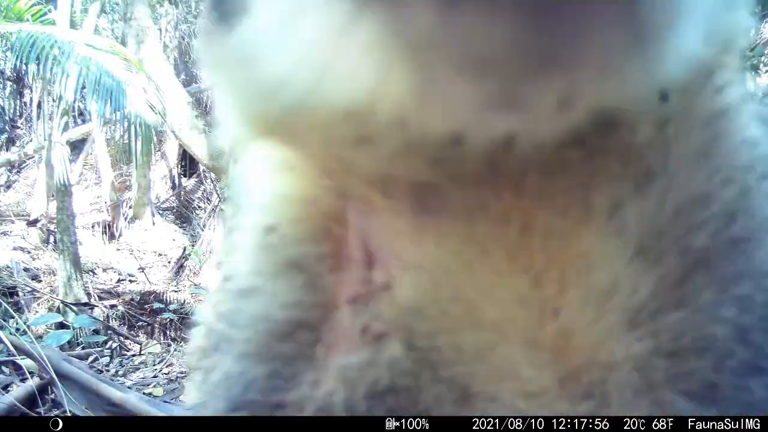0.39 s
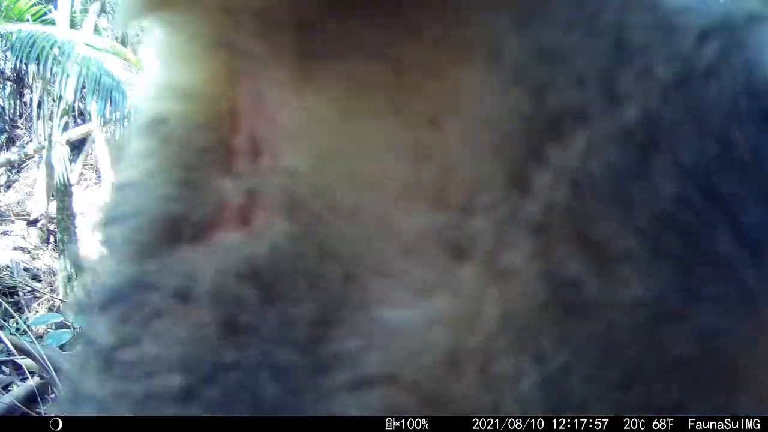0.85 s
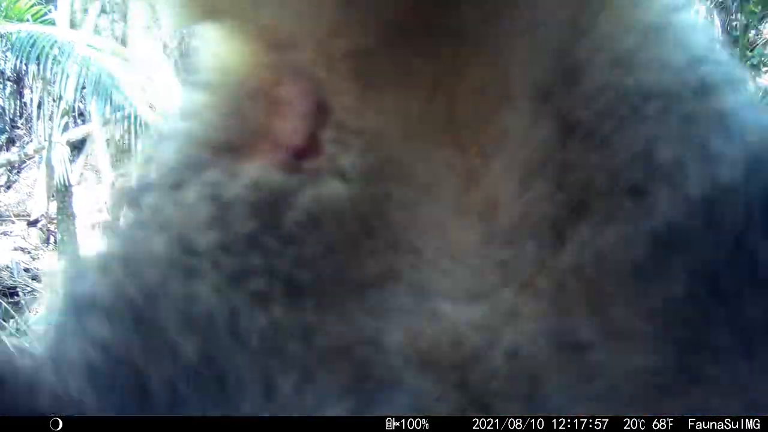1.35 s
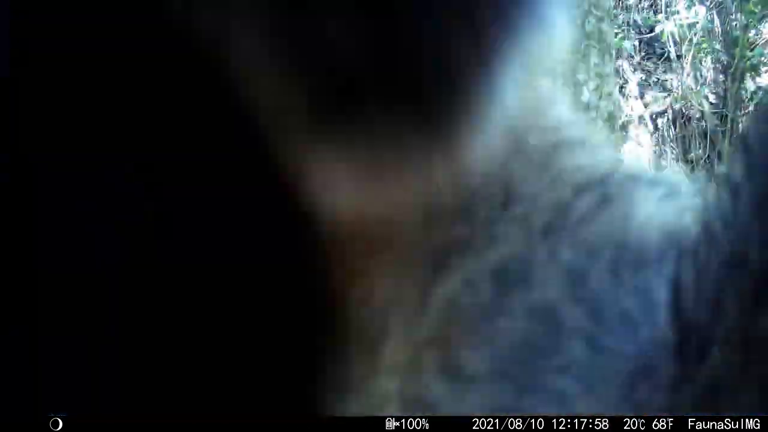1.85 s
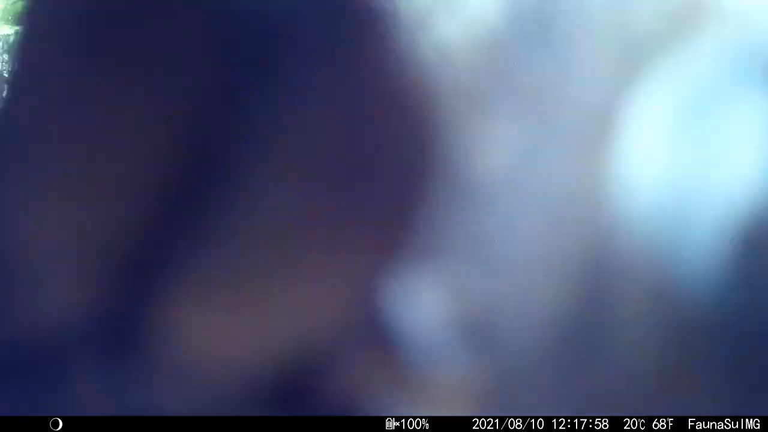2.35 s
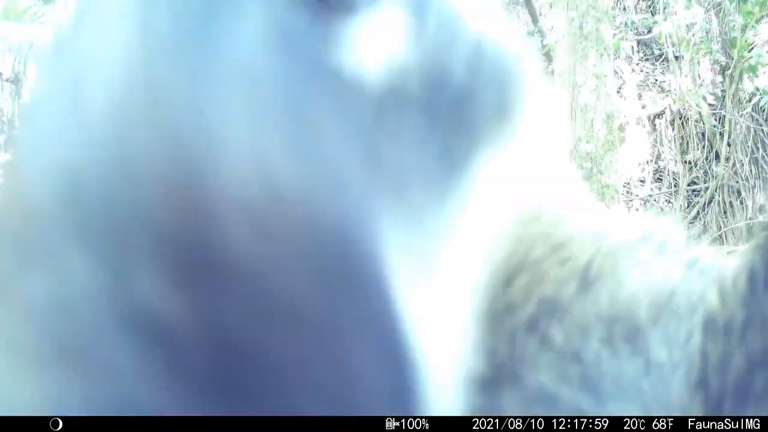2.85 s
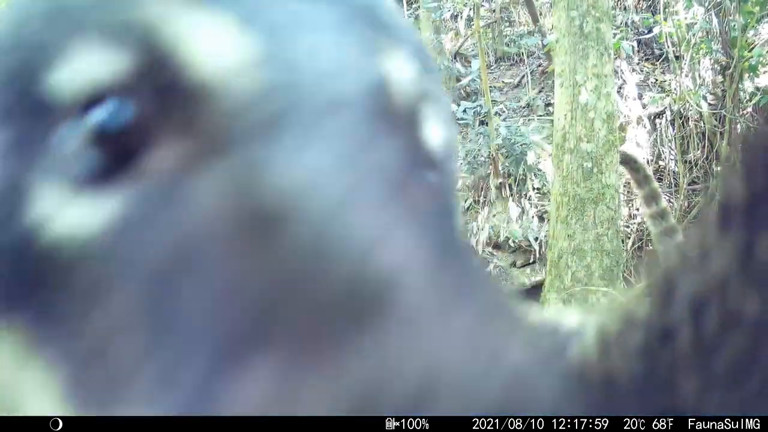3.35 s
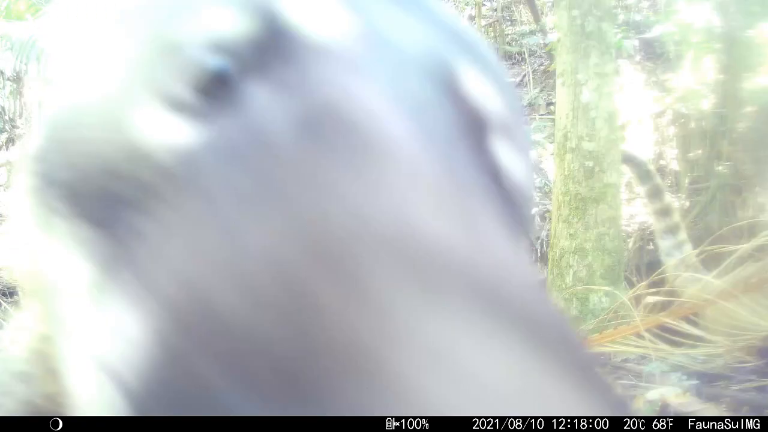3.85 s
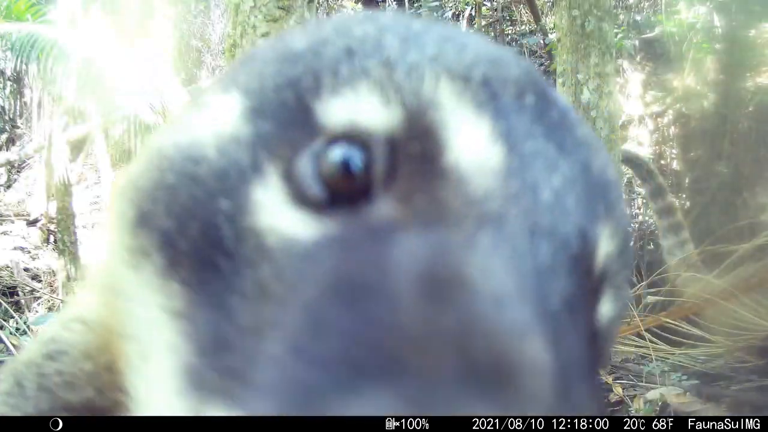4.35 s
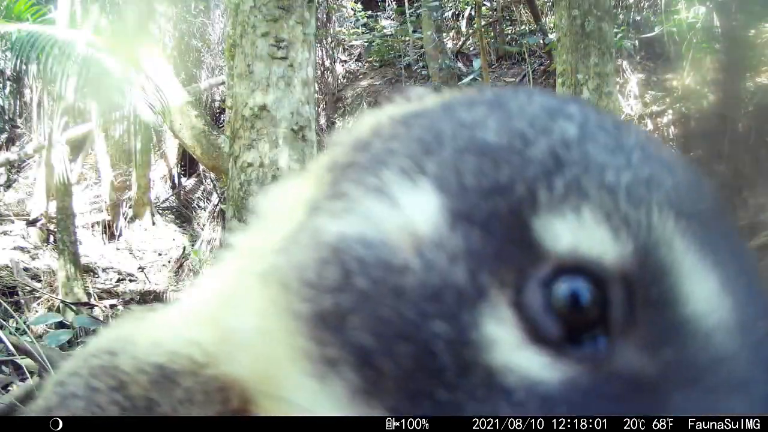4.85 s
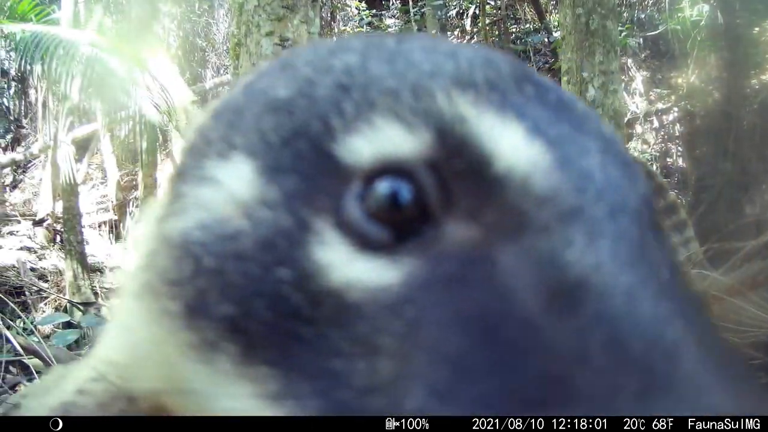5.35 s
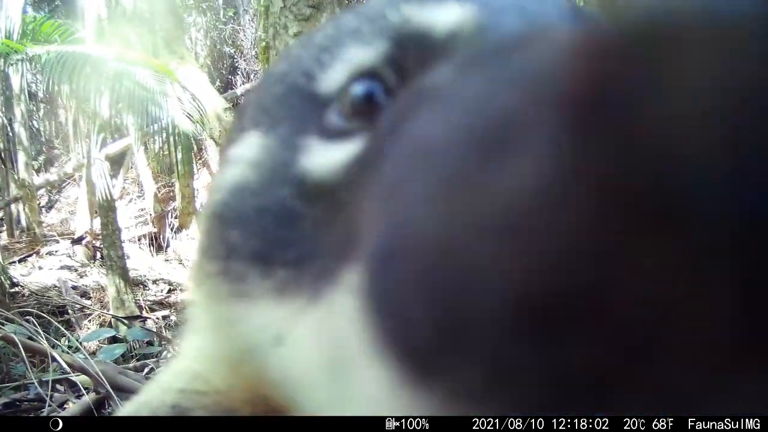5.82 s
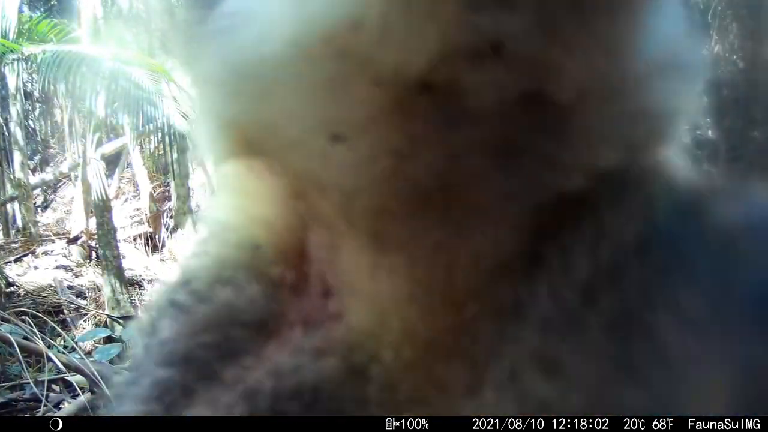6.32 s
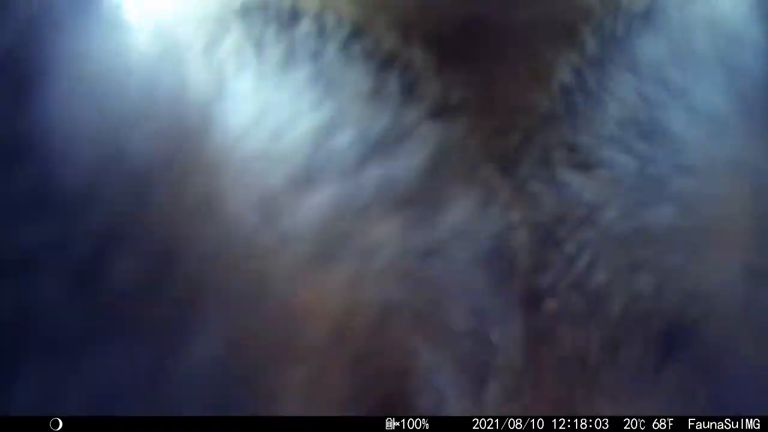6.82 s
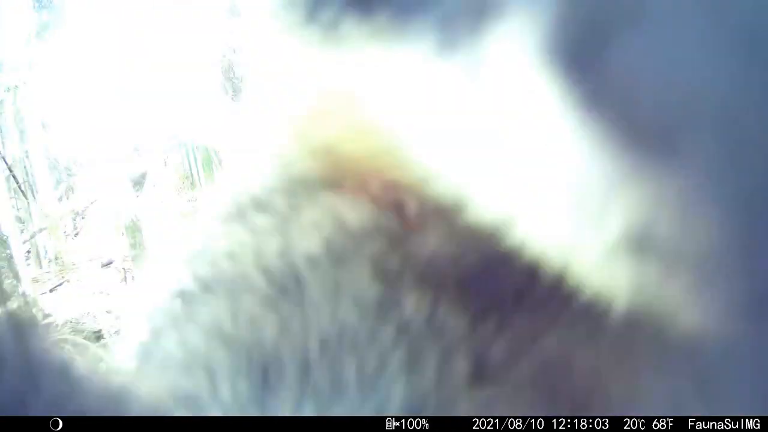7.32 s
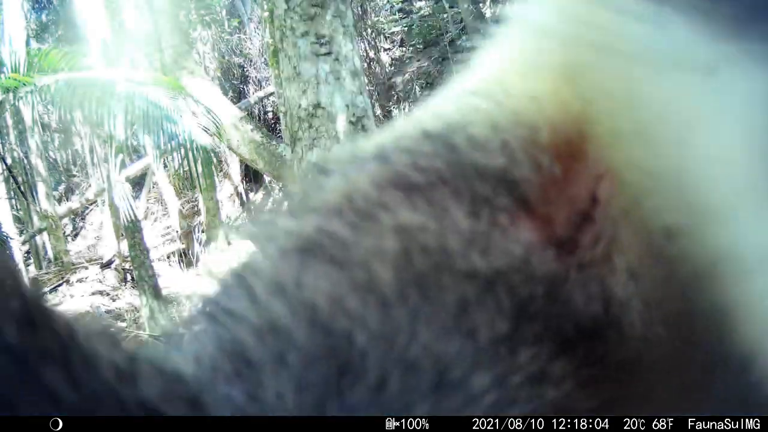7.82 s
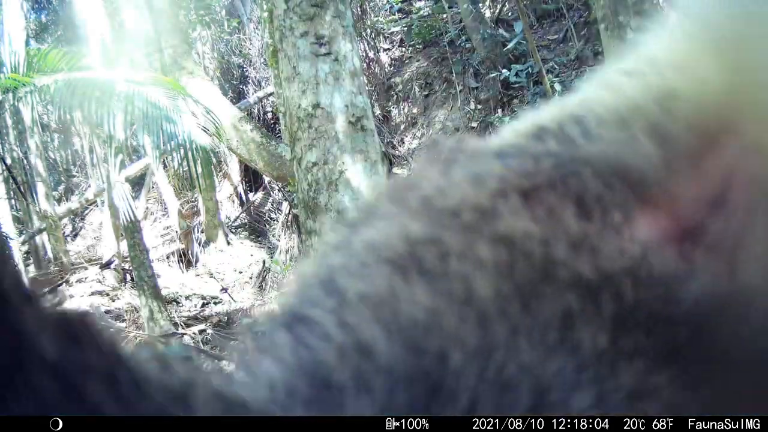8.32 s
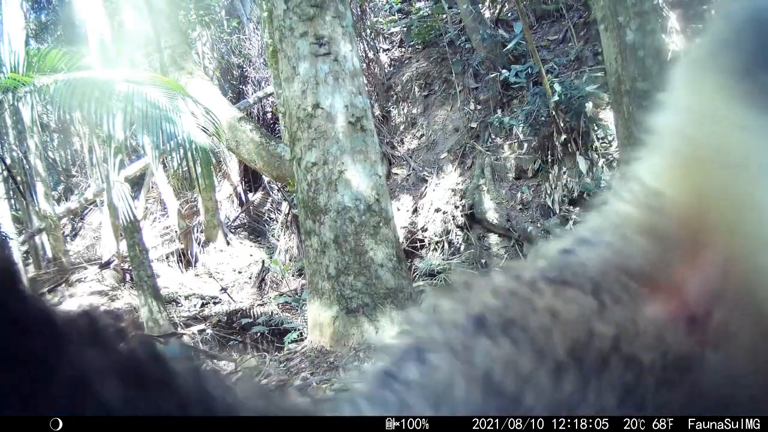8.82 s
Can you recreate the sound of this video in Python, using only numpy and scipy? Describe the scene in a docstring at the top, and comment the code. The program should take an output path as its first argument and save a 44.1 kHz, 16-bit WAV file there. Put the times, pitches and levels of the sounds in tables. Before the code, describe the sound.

A small furry mammal rubs, scrapes and claws a plastic case right at the microphone, with sharp clicks, soft bumps and two tiny squeaks.

```python
"""In a forest, right up against the microphone, a small mammal noses, rubs and claws a plastic camera case.
Faint forest and microphone hiss lies behind shaped noise for fur, case ringing and body rumble.
Claws scrape briefly or drag and set the case ringing; sniffs and nudges push on the microphone as pressure dips.
Now and then the animal gives thin gliding chirps and short falling grunts, made of sines."""
import sys
import numpy as np
from scipy import signal
from scipy.io import wavfile
from scipy.ndimage import uniform_filter1d

SR = 44100
rng = np.random.default_rng(int(sys.argv[2]) if len(sys.argv) > 2 else 0)


def linear_from_db(decibels):
    """Turn decibels (scalar or array-like) into linear amplitude factors; 0 gives 1."""
    return 10 ** (np.asarray(decibels, float) / 20)


def wrap_up_sound(samples):
    """Save the sound to the file named by the first command line argument, as 16-bit audio."""
    columns = np.atleast_2d(samples).T
    # keep every value between -1 and 1, then stretch to whole-number steps
    tamed = np.clip(columns, -1, 1)
    steps = np.round(tamed * 32767).astype(np.int16)
    wavfile.write(sys.argv[1], SR, steps)


N = 405279  # samples


def evened(x):
    """Scales to rms 1."""
    return x / np.sqrt(np.mean(x ** 2) + 1e-20)


def add(mix, start_s, sound):
    """Mixes a sound in from its start time."""
    part = mix[max(round(start_s * SR), 0):][:len(sound)]
    part += sound[:len(part)]


def noise(spectrum, patchy_db, size=512):
    """Noise of a given spectrum whose level drifts in patches of time and pitch, rms 1."""
    frames = 4 * N // size + 5
    bin_hz = np.fft.rfftfreq(size, 1 / SR)
    real, imaginary, patches = rng.standard_normal((frames, len(bin_hz), 3)).T
    patches = uniform_filter1d(patches, size=8, axis=0)
    patches = evened(uniform_filter1d(patches, size=12, axis=1))
    point_hz, point_db = np.transpose(spectrum)
    colour_db = np.interp(np.log(bin_hz + 1), np.log(point_hz + 1), point_db)[:, None]
    bins = (real + 1j * imaginary) * linear_from_db(colour_db + patchy_db * patches)
    return evened(signal.istft(bins, nperseg=size, noverlap=3 * size // 4)[1][:N])


def gritty(per_s, spread_db, grain_s):
    """Uneven contact: a steady gain with sudden short slips of random size on top, rms 1."""
    slip_db = spread_db * np.minimum(rng.exponential(1, N), 4)
    slips = (rng.random(N) < per_s / SR) * linear_from_db(slip_db)
    fade = np.exp(-1 / (grain_s * SR))
    return evened(1 + signal.lfilter([1], [1, -fade], slips))


# the small case cannot ring below its first mode
THIN = signal.butter(5, 1200, "high", fs=SR, output="sos")
# modes of the plastic case: pitch_hz, width_hz (before damping), level_db (relative)
CASE_MODES = [(1365, 720, -4), (2366, 510, 6.5), (3135, 255, 2.5), (4110, 770, 8.5), (5930, 2170, 9),
              (7400, 420, 0.5), (8950, 440, -25)]


def case_ring(gains_db, damping, shift):
    """Impulse response of the plastic case, energy 1; a grip on the case shifts and damps its modes."""
    hz, width_hz, level_db = np.transpose(CASE_MODES)[:, :, None]
    t = np.arange(900) / SR
    width_hz = width_hz * damping
    sign = (-1.) ** np.arange(len(CASE_MODES))[:, None]  # neighbouring modes move the wall in opposite ways
    modes = np.sqrt(width_hz) * np.exp(-np.pi * width_hz * t) * np.sin(2 * np.pi * hz * shift * t)
    ring = (sign * linear_from_db(level_db + gains_db) * modes).sum(0)
    return ring / np.linalg.norm(ring)


# forest and microphone hiss: pitch_hz, level_db (per Hz, relative)
AIR_SPECTRUM = [(12, -50.5), (20, -15), (45, -1.5), (120, -9), (160, -7), (596, -18.5), (11400, -44.5),
                (15000, -35.5), (16400, -26.5)]


def forest_air():
    """Steady forest and microphone hiss: patchy shaped noise at -57 dB rms."""
    return linear_from_db(-57) * noise(AIR_SPECTRUM, 3.0, size=1024)


# sniffs and nudges on the microphone: dip_s, level_db (peak), pitch_hz of the pressure dip
PUFFS = [(0.129, -44, 22), (0.292, -38, 25.1), (0.758, -38, 43.6), (1.227, -34, 68), (1.437, -37, 50.7),
         (1.96, -34, 29), (2.257, -38, 63), (2.756, -38, 28.8), (2.966, -45, 29), (3.188, -44.5, 23.4),
         (3.552, -32, 95), (3.769, -47, 24.5), (3.983, -45, 20.7), (4.262, -29, 36.8), (4.628, -44, 27.2),
         (4.981, -35, 66), (5.532, -36, 47.3), (5.965, -39.5, 28), (6.453, -42, 41.7), (6.617, -27, 65),
         (6.654, -28.5, 130), (6.765, -29, 44.2), (6.786, -29, 141), (7.401, -37, 37.7),
         (7.957, -42.5, 30.1), (8.133, -41.5, 60.4), (8.711, -44, 33), (9.058, -38, 54.6)]


def sniffs():
    """Each puff of air is one soft dip of pressure with a rise on either side."""
    out = np.zeros(N)
    for dip_s, level_db, hz in PUFFS:
        u = np.arange(-1.2 / hz, 2.4 / hz, 1 / SR) * hz
        puff = -linear_from_db(level_db) * np.cos(2 * np.pi * u) * np.exp(-2.5 * u ** 2)
        add(out, dip_s - 1.2 / hz, puff)
    return out


def voice(hz, level_db, peak, edge_db, waver_share):
    """Phase and loudness of one call: a wavering pitch, level up to a peak (place 0-1) and down again."""
    u = np.linspace(0, 1, len(hz))
    waver = evened(uniform_filter1d(rng.standard_normal(4000), size=40))[:len(hz)]
    from_peak = np.where(u < peak, 1 - u / peak, (u - peak) / (1 - peak))
    turns = 2 * np.pi * np.cumsum(hz * (1 + waver_share * waver)) / SR
    gain = np.sqrt(2) * linear_from_db(level_db + edge_db * from_peak ** 2)
    return turns, gain * signal.windows.tukey(len(hz), .25)


# evenly gliding chirps: start_s, length_ms, first_hz, last_hz, level_db (rms at the peak), peak place 0-1
CHIRPS = [(3.473, 8.2, 8040, 8360, -36, .5), (3.483, 16.5, 6900, 7460, -19.5, 1),
          (3.494, 17, 8440, 7900, -14.5, 0), (3.51, 11, 8950, 10700, -19, 0.75),
          (6.958, 8.1, 7650, 8400, -35.5, 0.63), (6.972, 22, 7280, 8330, -16, 0.42),
          (6.996, 23, 10200, 8800, -29.5, 1), (7.56, 37, 8200, 9700, -33.5, .75)]


def chirps():
    """Thin chirps: one wavering sine each, gliding evenly from the first pitch to the last."""
    out = np.zeros(N)
    for start_s, ms, first_hz, last_hz, level_db, peak in CHIRPS:
        hz = np.linspace(first_hz, last_hz, round(ms * SR / 1000))
        turns, gain = voice(hz, level_db, np.clip(peak, .05, .95), edge_db=-15, waver_share=.009)
        add(out, start_s, gain * np.sin(turns))
    return out


# grunts: start_s, length_ms, first_hz, level_db (rms of the fundamental at the peak)
GRUNTS = [(3.535, 33, 794, -21.5), (6.961, 9.5, 348, -40.5), (7.0105, 27, 673, -30.5),
          (7.591, 21, 342, -40)]
GRUNT_REST_HZ = 335
GRUNT_SAG, GRUNT_BREAK = .25, .32  # share of pitch lost before the break, place of the break 0-1
OVERTONE_DB, HALF_DB = -7, -5.5  # second harmonic before the break, half-pitch tone after it


def grunts():
    """Each grunt sags, then breaks to a resting pitch where every second pulse is weaker."""
    out = np.zeros(N)
    for start_s, ms, first_hz, level_db in GRUNTS:
        u = np.linspace(0, 1, round(ms * SR / 1000)) / GRUNT_BREAK
        high = 1 / (1 + u ** 16)  # 1 before the break, 0 after it
        hz = high * first_hz * (1 - GRUNT_SAG * u) + (1 - high) * GRUNT_REST_HZ
        turns, gain = voice(hz, level_db, peak=.56, edge_db=-15, waver_share=.1)
        overtone = linear_from_db(OVERTONE_DB) * high * np.sin(2 * turns)
        half_pitch = linear_from_db(HALF_DB) * (1 - high) * np.sin(turns / 2)
        add(out, start_s, gain * (np.sin(turns) + half_pitch + overtone))
    return out


# rumble of the body: pitch_hz, level_db (per Hz, relative)
BODY_SPECTRUM = [(50, -17), (90, -21.5), (340, -5.5), (520, -4.5), (900, -6.5), (1500, -16), (2600, -53)]


def body_rumble():
    """Low patchy noise of the body with uneven contact."""
    return noise(BODY_SPECTRUM, 1.5, size=1024) * gritty(120, 1.0, 0.004)


# hiss of fur: pitch_hz, level_db (per Hz, relative)
FUR_SPECTRUM = [(350, -48), (1250, -10.5), (2800, -13), (4400, -6.5), (6100, -6), (7200, -7), (10000, -10),
                (14300, -16), (15700, -35.5), (16400, -54.5)]


def fur_hiss(grit):
    """Fur sliding over the case: patchy shaped noise, roughened by the grit of the contact."""
    return grit * noise(FUR_SPECTRUM, 2.6, size=256)


GRIP_SHIFT, GRIP_PER_S = .025, 2  # largest shift of the modes as a share, new grips per second


def pressed_case(grit):
    """Gritty noise rings the damped low modes of the case, which a wandering grip moves, rms 1."""
    hz, _, level_db = np.transpose(CASE_MODES)[:, :, None]
    # a soft touch rings the low modes alike and misses the high ones
    missed_db = np.where(hz > 3600, -18, -level_db)
    drive = grit * gritty(90, 1.2, 0.006) * rng.standard_normal(N)
    grips = rng.random(N // SR * GRIP_PER_S + 9)
    grip = np.interp(np.arange(N) / SR * GRIP_PER_S, np.arange(len(grips)), grips)
    ring = np.zeros(N)
    for place in (0, .5, 1):  # crossfades between three grips
        share = np.sqrt(np.maximum(1 - 2 * abs(grip - place), 0))
        response = case_ring(missed_db, .4, 1 + GRIP_SHIFT * (2 * place - 1))
        ring += signal.oaconvolve(drive * share, response)[:N]
    ring = signal.sosfilt(signal.butter(4, 3600, fs=SR, output="sos"), ring)
    return evened(signal.sosfilt(THIN, ring))


def swells(rows):
    """Power over time of swells (peak_s, rise_ms and fade_ms per 20 dB, level_db), summed."""
    power, reach = np.zeros(N), 3
    round_off = 1.17  # shape in dB: 1 a pointed peak, 2 a rounded one
    for peak_s, rise_ms, fade_ms, level_db in rows:
        first = max(round((peak_s - reach * rise_ms / 1000) * SR), 0)
        last = min(round((peak_s + reach * fade_ms / 1000) * SR), N)
        at = np.arange(first, last)
        ms = (at / SR - peak_s) * 1000
        away = np.where(ms < 0, -ms / rise_ms, ms / fade_ms)
        power[at] += linear_from_db(level_db - 20 * away ** round_off) ** 2
    return power


# resting contact of fur and case between strokes: time_s, level_db (hiss)
REST = [(0.0, -37), (0.35, -48.5), (0.45, -33.5), (0.67, -34.5), (0.87, -38), (1.23, -41), (1.56, -51),
        (1.77, -48), (2.1, -50), (2.58, -55), (3.12, -54), (3.44, -58.5), (3.5, -56), (3.6, -40.5),
        (3.8, -45), (3.86, -55), (3.95, -53), (4.91, -54.5), (5.131, -37), (5.451, -65), (5.85, -58.5),
        (6.2, -54), (6.902, -54), (7.36, -48.5), (7.5, -42), (7.7, -52), (8.19, -53.5), (8.5, -50.5),
        (8.85, -48), (9.19, -46)]
REST_RING_DB, REST_RUMBLE_DB = -13.5, -11.5  # against the resting hiss
# rubbing strokes: peak_s, rise_ms and fade_ms (per 20 dB), level_db (fur hiss), ring_db (against the hiss)
STROKES = [(0.017, 5, 30, -26, -9), (0.12, 150, 344, -41.5, -10), (0.417, 33, 175, -21, -25),
           (0.731, 94, 77, -18.5, -19), (0.984, 34, 300, -25.5, -16), (1.201, 60, 104, -16.5, -7.5),
           (1.28, 45, 23, -22, -5), (1.425, 99, 194, -30, -26), (1.641, 277, 138, -30.5, -7),
           (1.958, 99, 144, -39.5, 5), (2.2, 46, 102, -38.5, 3.5), (2.256, 24, 52, -29.5, 4.5),
           (2.441, 44, 35, -34.5, 2.5), (2.527, 30, 27, -32, -0.5), (2.656, 44, 35, -28.5, 7.5),
           (2.779, 27, 126, -35, -5.5), (2.959, 64, 19, -24, -4.5), (3.029, 53, 57, -31.5, -4.5),
           (3.089, 35, 43, -37, -3.5), (3.516, 5, 74, -28, -35), (3.538, 15, 72, -28, -2),
           (3.665, 60, 200, -36.5, -2.5), (3.765, 150, 90, -34.5, -10), (3.824, 66, 7, -23.5, -9),
           (3.897, 79, 43, -45.5, 3), (4.194, 16, 46, -43, -2.5), (4.385, 18, 30, -44.5, -16),
           (4.66, 54, 120, -49.5, -1.5), (4.75, 100, 23, -46.5, -25), (4.909, 76, 100, -45.5, -10),
           (4.995, 35, 300, -33.5, -3), (5.12, 12, 7, -24, 10.5), (5.499, 23, 193, -47.5, -1.5),
           (5.549, 86, 18, -40, -0.5), (5.889, 4, 28, -37.5, -5), (6.158, 53, 27, -38.5, 5.5),
           (6.439, 14, 74, -28.5, -5), (6.473, 49, 9, -21.5, -4.5), (6.605, 30, 58, -34, 1.5),
           (6.697, 25, 94, -37.5, -10), (6.811, 112, 35.5, -30, -2.5), (7.018, 65, 135, -43, -6),
           (7.203, 72, 200, -30, -5.5), (7.277, 24, 58, -24, -6.5), (7.319, 132, 28, -22, -35),
           (7.601, 11, 129, -39.5, -12), (8.296, 72, 131, -24, -38), (8.422, 102, 123, -29.5, -11),
           (8.669, 98, 166, -40, -12), (8.973, 14, 23, -31, 1), (9.135, 18, 24, -30.5, 10.5)]
STROKE_RUMBLE_DB = -20  # against the hiss of a stroke
# a stroke that rings the case above LIGHT_DB loses hiss outside CORE_HZ, DULLING dB per dB
CORE_HZ, DULLING, LIGHT_DB = [3900, 10000], 0.29, -13
# the body leans on the camera: peak_s, swell_ms (per 20 dB, either way), level_db (rumble)
NUDGES = [(0.0, 103, -45), (0.449, 66, -41.5), (2.255, 81, -45.5), (2.523, 19.5, -23.5), (4.262, 48, -51),
          (4.998, 69, -37.5), (5.112, 106, -37.5), (5.526, 48, -37), (5.636, 8, -35.5),
          (5.892, 15.5, -30.5), (6.631, 53, -30.5), (6.69, 78, -47), (6.768, 71, -38.5), (7.018, 97, -49.5)]


def rubbing():
    """Fur hisses, the pressed case rings in its low modes, and the body rumbles."""
    rest = linear_from_db(np.interp(np.arange(N) / SR, *np.transpose(REST))) ** 2
    strokes = swells([row[:-1] for row in STROKES])
    pressed = swells([(s, rise, fade, db + ring_db) for s, rise, fade, db, ring_db in STROKES])
    airy = swells([(s, rise, fade, db - DULLING * max(ring_db - LIGHT_DB, 0))
                   for s, rise, fade, db, ring_db in STROKES])
    nudged = swells([(s, ms, ms, db) for s, ms, db in NUDGES])
    core_gain, outer_gain = np.sqrt(rest + strokes), np.sqrt(rest + airy)
    ring_gain = np.sqrt(linear_from_db(REST_RING_DB) ** 2 * rest + pressed)
    rumble_power = linear_from_db(REST_RUMBLE_DB) ** 2 * rest + linear_from_db(STROKE_RUMBLE_DB) ** 2 * strokes + nudged
    grit = gritty(150, 1.5, 0.0011)
    fur = fur_hiss(grit)
    outer = signal.sosfiltfilt(signal.butter(4, CORE_HZ, "bandstop", fs=SR, output="sos"), fur)
    hiss = core_gain * (fur - outer) + outer_gain * outer
    return hiss + ring_gain * pressed_case(grit) + np.sqrt(rumble_power) * body_rumble()


# a dragged claw rings one spot of the case: start_s, length_ms, pitch_hz, level_db (before the fade)
DRAGS = [(1.935, 82, 1750, -26.5), (3.528, 16, 2260, -22), (3.805, 19, 1480, -22.5),
         (5.0422, 10.4, 8680, -5.5), (5.053, 6.7, 1390, -11), (5.1089, 10.6, 2410, -10),
         (6.122, 19, 1840, -25.5), (6.128, 11, 3220, -27), (6.145, 11, 2270, -34), (6.625, 13, 1330, -29),
         (6.762, 20, 1320, -27), (8.945, 41, 1600, -26), (8.954, 24, 4480, -19), (9.14, 13, 2440, -23)]


def drags():
    """A dragged claw: noise through one narrow resonance, catching quickly and dying away."""
    out = np.zeros(N)
    width = .08  # of the resonance, as a share of its pitch
    for start_s, ms, hz, level_db in DRAGS:
        size = round(ms * SR / 1000)
        u = np.linspace(0, 1, size)
        grit = rng.standard_normal(6000)
        ring = signal.lfilter(*signal.iirpeak(hz, 1 / width, SR), grit)
        ring = evened(ring[1000:1000 + size])  # skips the build-up
        add(out, start_s, linear_from_db(level_db) * np.minimum(8 * u, 1) * (1 - u ** 2) * ring)
    return out


# claw ticks: start_s, level_db (relative), dull_db (tilt from high modes to low, relative),
# contact_ms (nominal length)
TICKS = [(0.3701, -24.5, 1, 3.5), (0.409, -25, -8, 4), (0.42, -25, -15, 3), (0.4406, -23.5, -58.5, 18),
         (0.46, -19, -30, 3), (0.528, -24, -46, 8.3), (0.6353, -17, -45, 1.8), (0.654, -18, -44, 3.4),
         (0.6668, -14.5, -36, 2.4), (1.028, -13.5, -36, 3.4), (1.192, -18, 2, 1.5), (1.203, -6.5, -20, 20),
         (1.238, -16.5, -74, 7.5), (1.2431, -9, 33, 0.83), (1.268, -7.5, -16, 3.3),
         (1.378, -26.5, -25, 9.5), (1.4313, -5, 1.5, 1.12), (1.464, -20.5, -2, 6.1), (1.5572, -9, 0, 6.2),
         (1.721, -16.5, 6, 1.3), (1.828, -33, -24, 1.4), (1.885, -25.5, 25, 2.5), (1.901, -29, 11, 1.8),
         (2.14, -14, -9, 1.4), (2.1449, -20.5, 6, 3.3), (2.1513, -27, 9, 8), (2.172, -23, -2, 2.5),
         (2.183, -17.5, 3, 3), (2.187, -19.5, 4, 7.4), (2.249, -19.5, 2, 5.4), (2.2564, -4, -8.5, 6.7),
         (2.2752, -24, 45, 1.9), (2.3152, -24, 11.5, 5.9), (2.394, -16.5, 0, 2.6), (2.467, -15, 20, 0.8),
         (2.4757, -24.5, 6, 3.4), (2.5117, -21.5, 17, 11), (2.537, -25, 22, 2.2), (2.606, -27, 14, 8.3),
         (2.636, -19.5, 11, 6.5), (2.806, -27.5, 4, 8.3), (2.9314, -20.5, -20, 36), (3.01, -27, -39, 12),
         (3.524, -17, -10, 2.9), (3.807, -18, 25, 3.7), (3.812, -18, 2, 2.6), (3.847, -23, 9, 0.97),
         (5.016, -20.5, 17, 4.4), (5.044, -4.5, -1, 5.4), (5.054, -11.5, 10, 5.9), (5.0617, -9.5, 13, 2.3),
         (5.087, -22, -8, 4.4), (5.109, -14.5, -4, 4.9), (5.118, -10.5, -8, 4.7), (5.236, -16, 8, 1.28),
         (5.309, -17.5, -1, 4.5), (5.4003, -38.5, 1.5, 6.8), (5.6317, -9.5, 7.5, 2.57),
         (5.879, -34.5, 5, 21.5), (6.086, -40.5, -34, 20), (6.0998, -27.5, 31, 4.8), (6.124, -35, -9, 10),
         (6.1445, -32, -10, 10), (6.168, -17.5, -7.5, 6.3), (6.487, -21.5, -13, 2.1), (6.628, -33, 18, 23),
         (6.7625, -2, -8.5, 1.35), (6.772, -21, -6, 6.7), (7.149, -31.5, 13, 7.4), (7.268, -17, -8, 13),
         (7.636, -29, -43, 2.3), (8.247, -23, -19, 1.84), (8.2877, -34, -25, 3), (8.9463, -15.5, -6, 5.2),
         (8.955, -20.5, -32, 8.2), (8.9621, -12.5, -6, 7.6), (8.973, -17, 13, 3.6), (9.056, -5, -7.5, 4.6),
         (9.1217, -16.5, -9, 2.2), (9.125, -14, -17, 3.9), (9.133, -20, -26, 6), (9.1412, -17, -17, 6.7)]
JOLT_DB, JOLT_PER_DB, JOLT_PER_DULL = 3.5, .5, 0.14  # hard and dull ticks jolt the camera more


def claws():
    """Each tick is a short scrape ringing the case at a new spot, plus a bright snap and a low jolt."""
    out, jolts, t = np.zeros(N), np.zeros(N), np.arange(1200) / SR
    octaves = np.log2(np.transpose(CASE_MODES)[0][:, None] / 3400)
    snap_filter = signal.butter(3, [3500, 12000], "band", fs=SR)
    for start_s, level_db, dull_db, ms in TICKS:
        spot_db = 1.8 * rng.standard_normal((len(CASE_MODES), 1))
        shift = 1 + .04 * rng.standard_normal((len(CASE_MODES), 1))
        # the claw holds, lets go and drags a little
        u = t / (max(ms - 1.2, .3) / 1000)
        contact = np.minimum(t / 0.0004, 1) * (np.exp(-u ** 3) + 0.12 * np.exp(-t / 0.004))
        scrape = contact * rng.standard_normal(len(t))
        scrape *= np.linalg.norm(contact) / np.linalg.norm(scrape)
        scrape[0] = 3  # the first impact
        tilt_db = (0.54 * dull_db + 0.5) * octaves
        tick = np.convolve(scrape, case_ring(spot_db - tilt_db, 0.86, shift))
        tick[:len(t)] += linear_from_db(-19.0 - .5 * dull_db) * signal.lfilter(*snap_filter, scrape)
        add(out, start_s, linear_from_db(level_db - 1.0) * tick)
        jolt_db = level_db + JOLT_DB + JOLT_PER_DB * level_db + JOLT_PER_DULL * max(dull_db, 0)
        add(jolts, start_s, linear_from_db(jolt_db) * tick)
    # the whole camera jolts, a little more one way than the other
    knock_filter = signal.butter(2, [120, 1100], "band", fs=SR)
    knock = signal.lfilter(*knock_filter, jolts + 0.12 * abs(jolts))
    return signal.sosfilt(THIN, out) + knock


def scene():
    """All sources at the microphone, in one channel."""
    animal = sniffs() + chirps() + grunts() + rubbing() + drags() + claws()
    return (forest_air() + animal)[None]


# moments when the top octave falls nearly silent: start_s, length_ms
TREBLE_OUT = [(0.282, 95), (1.374, 89), (1.53, 25), (1.568, 25), (2.136, 125), (2.392, 33), (2.489, 31),
              (2.585, 63), (2.904, 29), (3.447, 53), (5.02, 87), (5.305, 129), (5.624, 33), (5.848, 65),
              (6.105, 95), (6.424, 31), (6.744, 35), (6.937, 57), (7.131, 29), (8.222, 57), (8.923, 31),
              (9.058, 87)]


def treble_dropouts(full):
    """Fades briefly to a copy low-passed at 8650 Hz, letting 1.2 % of the top octave through."""
    dull = signal.oaconvolve(full, signal.firwin(255, 8650, window=("kaiser", 9), fs=SR)[None], "same")
    full = signal.oaconvolve(full, signal.firwin(255, 16000, window=("kaiser", 9), fs=SR)[None], "same")
    t = np.arange(N) / SR
    gone = sum(1. * (t > start_s) * (t < start_s + ms / 1000) for start_s, ms in TREBLE_OUT)
    gone = np.minimum(uniform_filter1d(gone, size=300), 1)
    return full + (1 - 0.012) * gone * (dull - full)


def band_limit(x):
    """A steep low-pass at the top of the band."""
    return signal.sosfilt(signal.butter(12, 16500, fs=SR, output="sos"), x)


def record(dry):
    """The loudest ticks overload the input softly; the top octave cuts out at times."""
    ceiling = 0.9
    clipped = ceiling * np.tanh(dry / ceiling)
    mix = treble_dropouts(clipped)
    return band_limit(mix)


dry = scene()
out = record(dry)
wrap_up_sound(out)
```